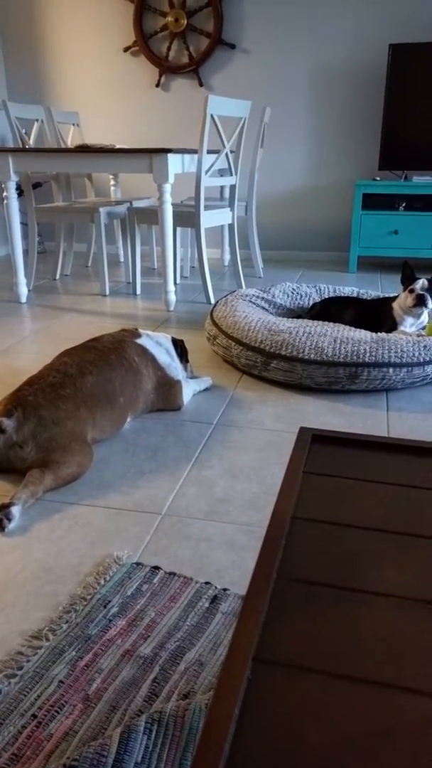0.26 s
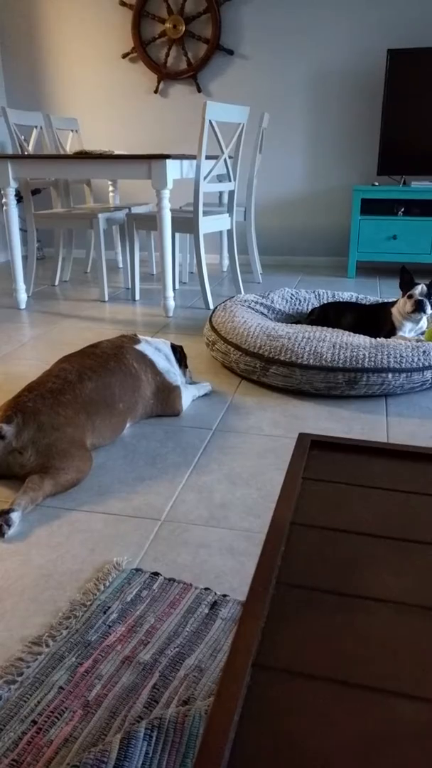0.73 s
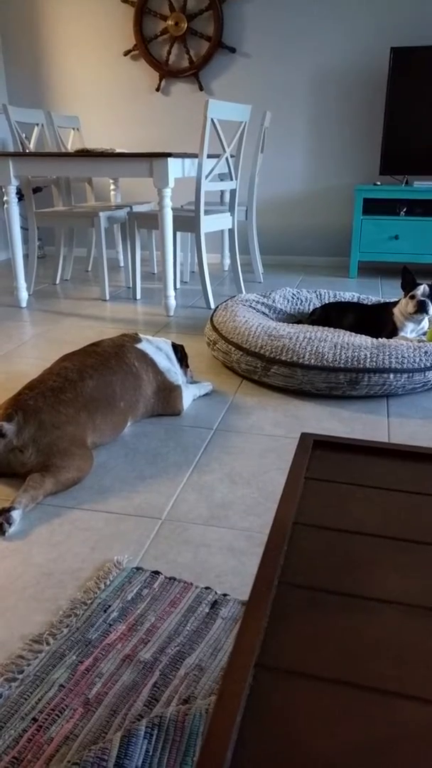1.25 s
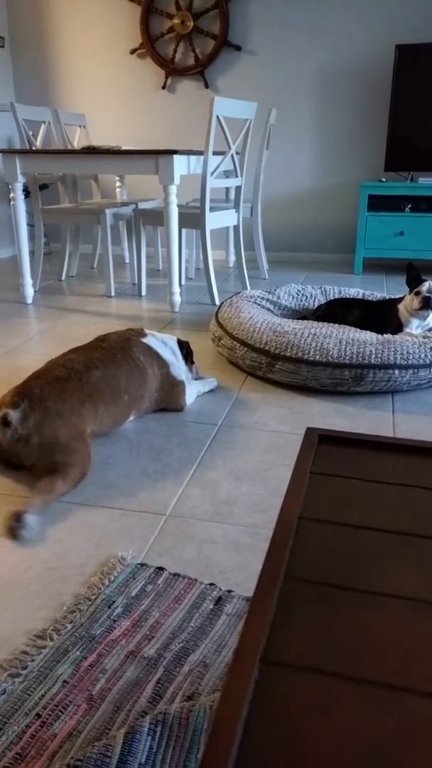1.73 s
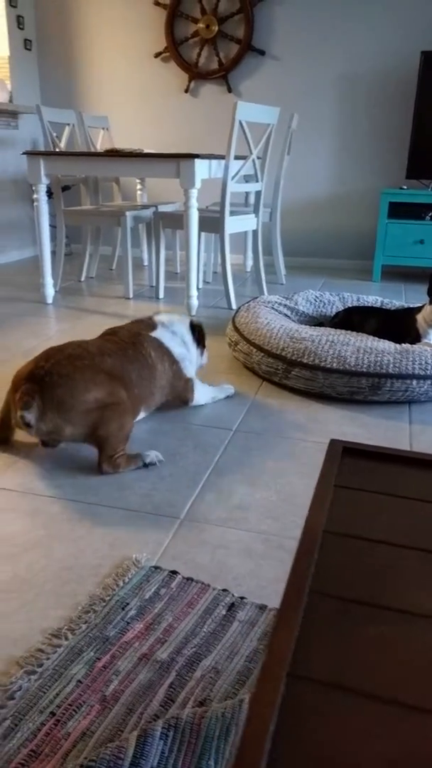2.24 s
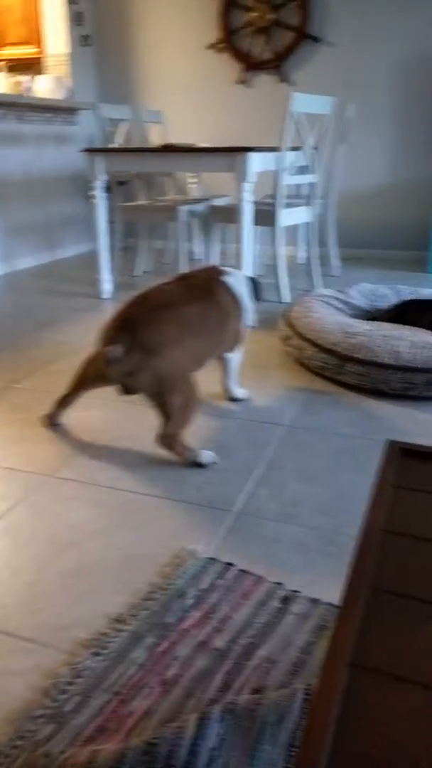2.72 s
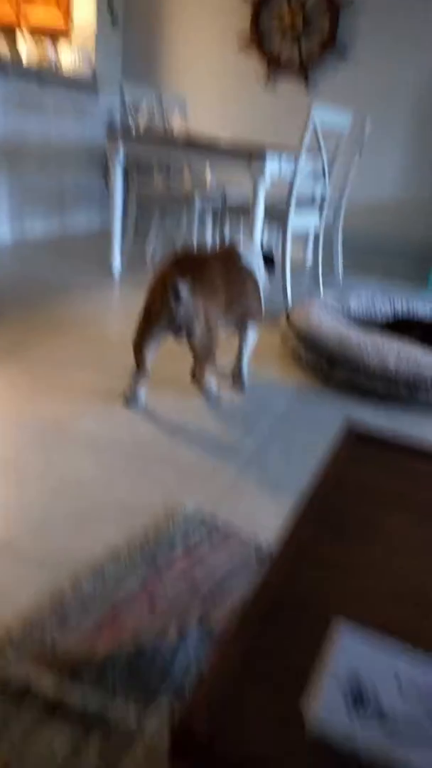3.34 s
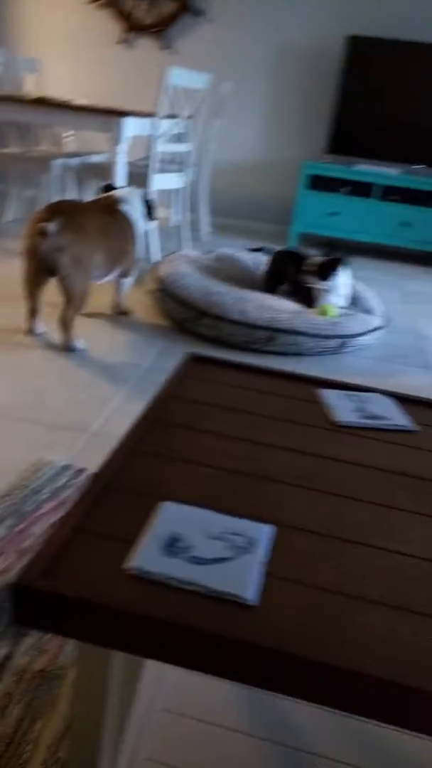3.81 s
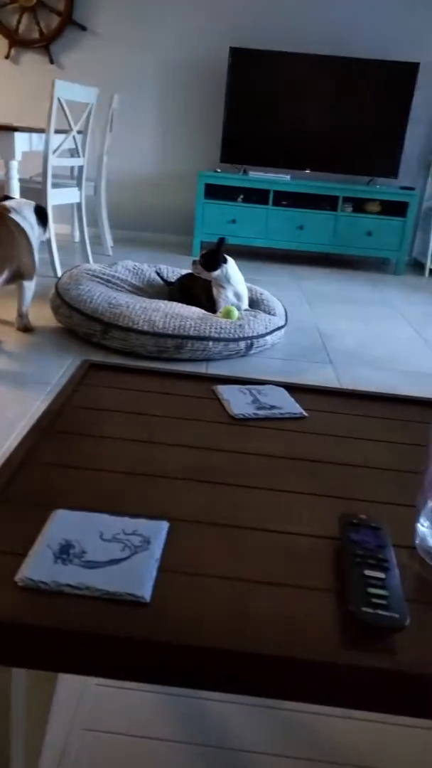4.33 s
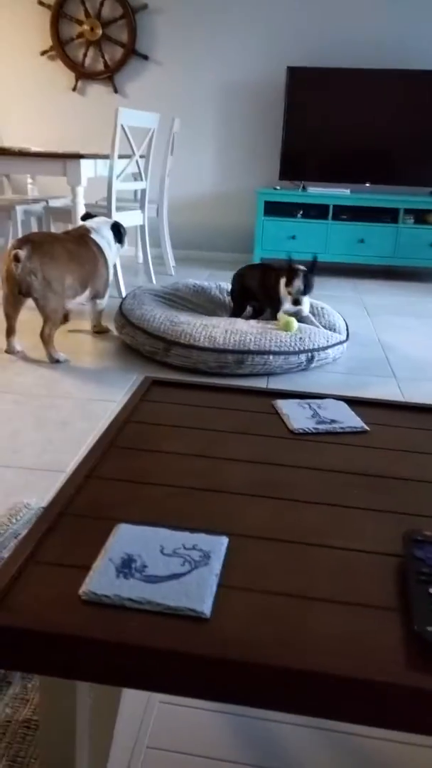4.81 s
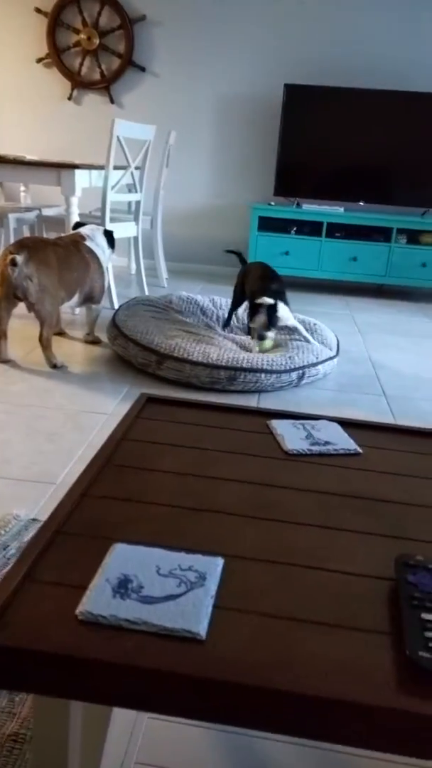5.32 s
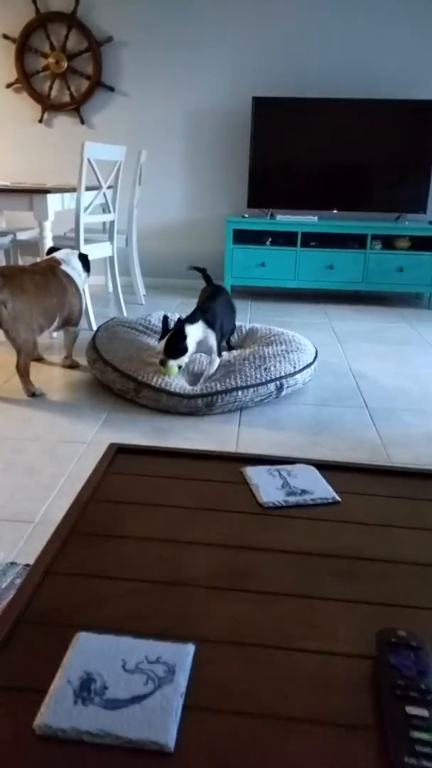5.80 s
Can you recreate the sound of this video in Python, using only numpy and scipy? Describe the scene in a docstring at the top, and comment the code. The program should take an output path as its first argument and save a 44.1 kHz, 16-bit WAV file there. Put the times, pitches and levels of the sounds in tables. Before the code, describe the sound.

A short electric crackle, then a dog grumbles low, scrambles up and barks loudly twice in an echoing room.

```python
"""A bulldog barks twice in a tiled living room, heard from a phone. Uneven vocal-fold pulses excite the
resonances of its throat and mouth (source and filter); slower pulses make its grumbles and growls.
Its nose wheezes, claws tick and fabric rustles as it scrambles up. Before the first grumble, a train of
electric discharges crackles close by, like a spark gap firing. The phone's limiter clamps each bark
and lets go slowly, so the reverberation hangs on before it dies into the hush of the house."""
import sys
import numpy as np
from scipy import signal
from scipy.fft import rfft, irfft
from scipy.io import wavfile
from scipy.ndimage import uniform_filter1d

SR = 44100
rng = np.random.default_rng(int(sys.argv[2]) if len(sys.argv) > 2 else 0)


def persist_wave(psi):
    """Save psi, clipped to +-1, as 16-bit WAV."""
    counts = np.round(np.clip(psi, -1, 1) * 32767).astype(np.int16)
    wavfile.write(sys.argv[1], SR, np.atleast_2d(counts).T)


N = 267113
TIME = np.arange(N) / SR
BINS_HZ = np.maximum(np.arange(32769) * SR / 65536, 1)
# At both ends of a call the vocal folds are slack: quieter, lower and rougher.
SLACK_DB, SLACK_OCTAVES, SLACK_ROUGH = 30, .45, .7

# Resonances of the open mouth, one set a bark, and of the lips: centre_hz, width_hz, gain_db
FIRST_MOUTH = [(604.6, 172, 2.5), (937, 193, -1.5), (1497, 210, -9.5), (1689, 86, -10.5),
               (2650, 157, -13.5), (2908, 88, -14.5), (3900, 110, -33.5), (4800, 830, -40.5),
               (6500, 950, -33.5), (8700, 3300, -43)]
SECOND_MOUTH = [(562.5, 160, 5.5), (906, 265, 2), (1392, 145, -3.5), (1887, 260, -13.5), (2723, 450, -13),
                (3017, 73, -16.5), (3465, 350, -31), (5090, 700, -38), (6600, 1140, -30), (9000, 6500, -38)]
LIP_RESONANCES = [(1883, 280, 6.5), (5100, 970, -14.5), (7420, 1800, -17.5), (11500, 4000, -25)]
# Antiresonances of the throat's side cavities: centre_hz, width_hz
ANTIRESONANCES = [(2240, 200), (4370, 710)]
# Barks, timed from the opening of the jaw:
# start_s, hold_s, release_s, level_db, pitch_hz, blast_db, windup_lead_s, windup_db, windup_top_hz
BARKS = [(3.567, .075, .085, -0.5, 571.5, -21, .02, -16.5, 270.1),
         (4.663, .04, .14, -0.5, 562.5, -15, .04, -24, 360)]

def barks(attack_s=.065, sag_octaves_per_s=1.3, fray_per_s=4, jaw_open_s=.1, muffle_db=-9.5):
    """Source and filter: a voice that arches, sags and frays excites the mouth, with a blast of air."""
    out = np.zeros(N)
    air = unit(resonate(rng.standard_normal(N), LIP_RESONANCES))
    for bark, mouth in zip(BARKS, (FIRST_MOUTH, SECOND_MOUTH)):
        start, hold, release, db, hz, blast_db, *_ = bark
        t, slack = swell(attack_s, hold, release)
        past_peak = np.maximum(t, 0)
        pitch = hz * 2 ** (-sag_octaves_per_s * past_peak - SLACK_OCTAVES * slack)
        rough = .27 + fray_per_s * past_peak + SLACK_ROUGH * slack
        call = voice(start, pitch, db - SLACK_DB * slack, rough, mouth,
                     jitter=.11, shimmer_db=7, rasp=1.25, doubling=.42)
        # the treble comes in as the jaw opens
        bass = signal.sosfiltfilt(signal.butter(4, 2100, fs=SR, output="sos"), call)
        closed = np.clip(1 - (TIME - start) / jaw_open_s, 0, 1)
        out += bass + undb(muffle_db * closed) * (call - bass)
        # air tears past the lips just after the start
        out += air * undb(blast_db) * gaussian(start + .056, half_s=.034)
    for hz, width in ANTIRESONANCES:
        out = signal.lfilter(*signal.iirnotch(hz, hz / width, fs=SR), out)
    return out


def voice(start, hz, db, rough, formants, jitter, shimmer_db, rasp, doubling):
    """Phonation: uneven vocal-fold pulses, each with a puff of turbulence, excite the formants."""
    rough = np.clip(rough, 0, 1)
    cycle = np.cumsum(hz) / SR
    chance = rng.standard_normal((int(cycle[-1]) + 2, 2))
    wobble = np.interp(cycle, np.arange(len(chance)), chance[:, 0])
    phase = np.cumsum(hz * np.exp(jitter * rough * wobble)) / SR
    onsets = np.flatnonzero(np.diff(np.floor(phase)))
    shimmer = undb(shimmer_db * rough[onsets] * chance[cycle[onsets].astype(int), 1])
    alternation = 1 + doubling * (-1) ** np.arange(len(onsets))  # period doubling: strong, weak
    pulses = np.zeros(len(hz))
    pulses[onsets] = shimmer * alternation * np.sqrt(SR / hz[onsets])
    puffs = unit(np.exp(-2 * (phase % 1)) * rng.standard_normal(len(hz)))
    sound = resonate(pulses + rasp * rough * puffs, formants)
    # the dog's effort sets the loudness wherever the harmonics fall
    power = uniform_filter1d(sound ** 2, SR // 20)
    out = np.zeros(N)
    add(out, start, sound / np.sqrt(power + 1e-12) * undb(db))
    return out


def swell(attack_s, hold_s, release_s):
    """Envelope of effort: time from the peak, and slackness (1 at both ends, 0 during the hold)."""
    t = np.arange(-attack_s, hold_s + release_s, 1 / SR)
    return t, np.where(t < 0, t / attack_s, np.maximum(t - hold_s, 0) / release_s) ** 2


# Formants with the lips parting and with the throat tight: centre_hz, width_hz, gain_db
PARTING_LIPS = [(192, 69, 9.5), (424, 210, 13.5), (1000, 330, -42), (1720, 150, -32)]
TIGHT_THROAT = [(132, 100, 4), (190, 70, 7), (231, 81, 2), (350.3, 70, -4.5), (1000, 128, -10.5),
                (2650, 800, -32), (6300, 1400, -31)]

def windups(rise_octaves_per_s=10, swell_db=13):
    """Onset glide: the voice shoots up in pitch and level as the lips part for each bark."""
    out = 0
    for (bark_start, *_, lead, db, top_hz), formants in zip(BARKS, (PARTING_LIPS, TIGHT_THROAT)):
        t, slack = swell(attack_s=.055, hold_s=0, release_s=.025)
        pitch = top_hz * 2 ** (rise_octaves_per_s * np.minimum(t, 0))
        rough = .25 + SLACK_ROUGH * slack
        out += voice(bark_start - lead, pitch, db - swell_db * slack, rough, formants,
                     jitter=.22, shimmer_db=8, rasp=.65, doubling=.1)
    return out


# Formants with the mouth shut: centre_hz, width_hz, gain_db
SHUT_MOUTH = [(120, 72, 3), (178, 80, 5), (237, 35, -4.5), (590, 49, -7), (940, 160, -17),
              (2400, 220, -30.5), (3270, 620, -29)]
# Low calls, by throat shape:
# start_s, attack_s, hold_s, release_s, level_db, pitch_hz, glide_octaves_per_s, roughness (0-1)
GRUMBLES = { "shut": [(1.34, .13, .2, 0.11, -60, 90.5, -.1, .85),
            (1.59, .31, .17, .35, -39.5, 110.9, -.7, .55)],
            "tight": [(4.22, .08, .31, .09, -40, 117, .8, .45)],
            "open": [(3.18, 0.06, .23, .08, -62, 93.4, .8, .95)]}

def grumbles():
    """Low phonation: the folds flutter behind loose lips; pitch and clearness follow the effort."""
    out, formants = 0, {"shut": SHUT_MOUTH, "tight": TIGHT_THROAT, "open": FIRST_MOUTH}
    for shape, calls in GRUMBLES.items():
        for start, attack, hold, release, db, hz, glide, rough in calls:
            t, slack = swell(attack, hold, release)
            pitch = hz * 2 ** (glide * t - SLACK_OCTAVES * slack)
            out += voice(start, pitch, db - SLACK_DB * slack, rough + SLACK_ROUGH * slack,
                         formants[shape], jitter=.27, shimmer_db=6.5, rasp=1.1, doubling=.25)
    return out


# Spectrum of a discharge: frequency_hz, gain_db
SPARK_SPECTRUM = [(120, -20), (200, -25.5), (280, -1.5), (400, -12.5), (620, -5), (760, -10), (1000, -1.5),
                  (2000, -4.5), (3000, 2), (4200, -0.5), (5200, -6.5), (7400, -5), (9000, -9), (12300, -1),
                  (15500, -10)]

def sparks(start_s=.596, length_s=.12, rate_hz=285, level_db=-13, droop_db=6.5, arc_s=.0022):
    """Impulsive discharges: they come faster, weaker and less evenly as the charge runs down."""
    train, t = np.zeros(int(length_s * SR) + SR // 20), 0
    for noise in rng.standard_normal((64, SR // 100)):
        spent = t / length_s
        if spent > 1:
            break
        samples = int(arc_s * SR * (1 - .55 * spent))
        arc = undb(-15) * noise[1:samples + 1]  # sizzle while the arc stands
        arc[0] += 1  # one crack, then two more within a moment
        arc[rng.integers(0, samples, size=2)] += rng.uniform(.72, .8, size=2)
        add(train, t, arc * undb(-droop_db * spent ** 2))
        jitter = np.interp(spent, (0, 1), (.06, .3))  # in periods
        t += np.exp(jitter * noise[0]) / (rate_hz * (1 + .35 * spent))
    crackle, out = colour(train, SPARK_SPECTRUM), np.zeros(N)
    add(out, start_s, undb(level_db) * crackle / np.std(crackle[:SR // 20]))
    return out


# Breaths through the nose: peak_s, level_db, half_length_s, whistle_hz
WHEEZES = [(2.1, -63, .2, 3200), (2.7, -68.5, 0.37, 3320), (4.45, -62.5, 0.24, 6100),
           (5.55, -66.5, .22, 3130)]

def wheezes(relative_width=.23):
    """Narrow-band flow noise: air whistles faintly through the bulldog's tight nostrils."""
    out = 0
    for peak, db, half, hz in WHEEZES:
        whistle = unit(resonate(rng.standard_normal(N), [(hz, relative_width * hz, 0)]))
        out += undb(db) * gaussian(peak, half) * whistle
    return out


# Claws striking the floor: start_s, level_db, ring_hz
CLAW_TICKS = [(.4184, -53.5, 3760), (1.1544, -68, 3580), (1.2555, -53, 3130), (4.5431, -51, 3440)]

def claw_ticks(width_hz=1100, decay_s=.0025):
    """Impact: each small, hard contact excites one heavily damped resonance."""
    out, t = np.zeros(N), TIME[:SR // 20]
    for start, db, hz in CLAW_TICKS:
        contact = rng.standard_normal(len(t)) * np.exp(-t / decay_s)
        tick = resonate(contact, [(hz, width_hz, 0)])
        add(out, start, 2 * undb(db) * tick / np.abs(tick).max())
    return out


# Steady rustle of the moving body: time_s, level_db
BODY_STIR = [(1.9, -70), (2.2, -51), (2.45, -65.5), (2.7, -59), (2.95, -62.5), (3.33, -53), (3.6, -53.5),
             (4.1, -63), (4.55, -62), (5.2, -75), (5.53, -63.5), (5.8, -75)]
# Paws and belly scuffing the floor: start_s, level_db, decay_s
SCUFFS = [(.16, -61, 0.069), (1.218, -54, .065), (1.8, -53.5, 0.042), (1.939, -54, 0.11), (2.174, -51, .2),
          (2.509, -53, 0.061), (2.799, -52, 0.12), (2.986, -52.5, 0.076), (3.08, -44, .08)]
# Spectrum of slipping fibres: frequency_hz, gain_db
RUSTLE_SPECTRUM = [(300, -30.5), (1500, -11), (3500, -5), (7000, -3), (11000, -2), (15500, -6.5)]

def rustles(rise_s=.008, grain_db=.5, grain_samples=64):
    """Friction noise: fibres slip in short scuffs over a steady stir; incoherent, they add in power."""
    power = undb(np.interp(TIME, *np.transpose(BODY_STIR), left=-np.inf, right=-np.inf)) ** 2
    for start, db, decay in SCUFFS:
        t = TIME - start
        stroke = np.clip(t / rise_s, 0, 1) * np.exp(-np.maximum(t - rise_s, 0) / decay)
        power += (undb(db) * stroke) ** 2
    noise = rng.standard_normal(N)
    grains = np.repeat(rng.standard_normal(N // grain_samples + 1), grain_samples)[:N]
    return unit(colour(noise * undb(grain_db * grains), RUSTLE_SPECTRUM)) * np.sqrt(power)


def thump(peak_s=2.882, pitch_hz=50, level_db=-36):
    """Soft impact: one low-frequency pulse as the dog finds its feet."""
    tone = np.sin(2 * np.pi * pitch_hz * (TIME - peak_s))
    return undb(level_db) * gaussian(peak_s, half_s=.014) * tone


# Spectrum of the house's background noise: frequency_hz, gain_db
HUSH_SPECTRUM = [(12, -21), (20, 2), (68, -5), (126, -12.5), (148, -19.5), (238, -20.5), (342, -26.5),
                 (382, -23.5), (427, -25.5), (1100, -31), (1410, -32.5), (2840, -32.5), (3450, -36),
                 (15500, -34.5)]

def hush(noise_db=-55.5, hum_hz=240, hum_db=-71):
    """Noise floor: the broadband rumble and hiss of the house, and an appliance's faint pure tone."""
    noise = unit(colour(rng.standard_normal(N), HUSH_SPECTRUM))
    return undb(noise_db) * noise + undb(hum_db) * np.sin(2 * np.pi * hum_hz * TIME)


# Reverberation of the tiled room: frequency_hz, t60_s, level_db
REVERBERATION = [(100, 1, -1), (266, .48, -0.5), (566, 0.65, 0.5), (1100, 0.72, 1), (2780, .62, 2),
                 (4800, 0.66, 0), (6570, 0.59, 4), (12060, 0.44, -6.5)]

def room_response(build_s=.012):
    """Diffuse field: echoes build up quickly, then decay exponentially, each band at its own rate."""
    t, table = TIME[:SR], np.array(REVERBERATION)
    spectrum, hz = rfft(rng.standard_normal(SR)), np.arange(SR // 2 + 1)
    centres = np.geomspace(60, 16000, 17)
    tail = 0
    for centre, pick in zip(centres, np.eye(len(centres))):
        weight = np.interp(hz, centres, pick)  # triangular band
        t60, db = lookup(table[:, :2], centre), lookup(table[:, ::2], centre)
        envelope = np.exp(-np.log(1000) * t / t60) * (1 - np.exp(-t / build_s))
        band = irfft(spectrum * weight, SR) * envelope
        tail += undb(db) * unit(band) * np.sqrt(weight.mean())
    return tail / np.sqrt(SR)


def in_room(x, room, direct_db, wet_db):
    """Superposition of the direct sound and the reverberant field."""
    return undb(direct_db) * x + undb(wet_db) * signal.fftconvolve(x, room)[:N]


def resonate(x, modes):
    """Parallel resonances (centre_hz, width_hz, gain_db), each squared so the valleys stay dark."""
    response = sum(undb(db) / (1 + 1j * hz / width * (BINS_HZ / hz - hz / BINS_HZ)) ** 2
                   for hz, width, db in modes)
    return signal.fftconvolve(x, irfft(response)[:SR // 10])[:len(x)]


def colour(x, points):
    """Minimum-phase filter through (frequency_hz, gain_db) points, made by folding the cepstrum."""
    cepstrum = irfft(lookup(points, BINS_HZ) * np.log(10) / 20)
    cepstrum[1:len(BINS_HZ) - 1] *= 2
    cepstrum[len(BINS_HZ):] = 0
    impulse = irfft(np.exp(rfft(cepstrum)))[:SR // 10]
    return signal.fftconvolve(x, impulse)[:len(x)]


def lookup(points, hz):
    """Interpolate (frequency_hz, value) points on a log-frequency axis."""
    frequencies, values = np.transpose(points)
    return np.interp(np.log(hz), np.log(frequencies), values)


def gaussian(peak_s, half_s):
    """Bell-shaped envelope that falls to 1/e at half_s either side of its peak."""
    return np.exp(-((TIME - peak_s) / half_s) ** 2)


def undb(db):
    """Decibels to amplitude ratio."""
    return 10 ** (np.asarray(db) / 20)


def unit(x):
    """Scale to rms 1."""
    return x / np.sqrt(np.mean(x ** 2))


def add(out, start_s, x):
    """Superpose x on out from start_s."""
    i = int(start_s * SR)
    out[i:i + len(x)] += x[:len(out) - i]


# The sparks beam their treble at the phone; the walls receive this: frequency_hz, gain_db
SPARK_DIRECTIVITY = [(300, 2.5), (1000, 2.5), (4900, 0), (6200, -9), (9000, -7), (12300, -7.5), (15500, 2)]

def scene():
    """Direct and reverberant sound: the sparks are near; the dog faces away, so its barks ring more."""
    room, crackle = room_response(), sparks()
    out = crackle + undb(-14) * signal.fftconvolve(colour(crackle, SPARK_DIRECTIVITY), room)[:N]
    # grumbles and wind-ups sound close and fairly dry, with little room echo
    out += in_room(grumbles() + windups(), room, direct_db=-1, wet_db=-7)
    out += in_room(barks(), room, direct_db=-4, wet_db=-5.5)
    out += in_room(claw_ticks(), room, direct_db=6.5, wet_db=-16)
    return (out + wheezes() + rustles() + thump() + hush())[None]


def record(dry, ceiling_db=-10, release_db_per_s=55, top_hz=15800):
    """Limiting: the gain drops at once and recovers slowly; soft clipping and a low-pass follow."""
    power = np.abs(uniform_filter1d(dry[0] ** 2, SR // 200))
    excess_db = np.maximum(10 * np.log10(power + 1e-12) - ceiling_db, 0)
    recovery_db = release_db_per_s * TIME
    cut_db = np.maximum.accumulate(excess_db + recovery_db) - recovery_db
    limited = dry[0] * undb(-cut_db)
    rounded = limited / (1 + (limited / .7) ** 8) ** .125
    return signal.sosfilt(signal.ellip(10, .2, 80, top_hz, fs=SR, output="sos"), rounded)[None]


dry = scene()
out = record(dry)
persist_wave(out)
```